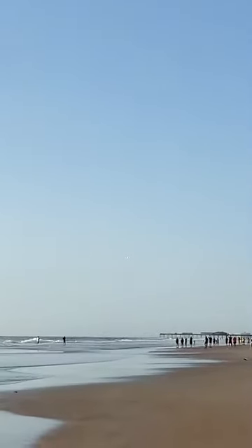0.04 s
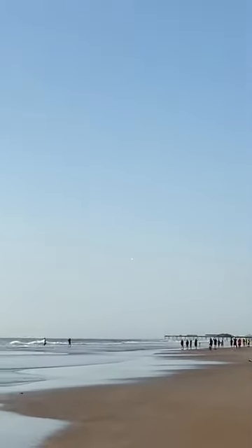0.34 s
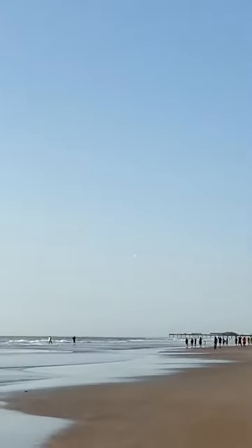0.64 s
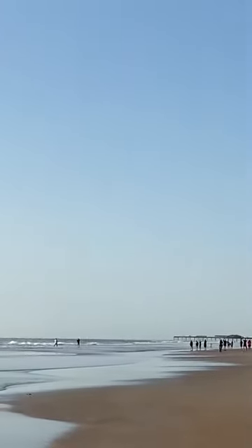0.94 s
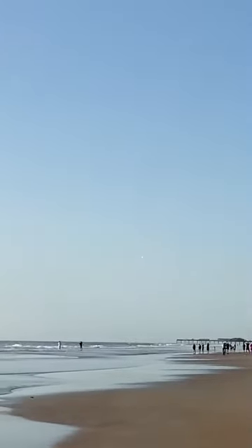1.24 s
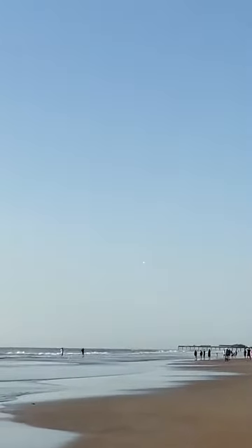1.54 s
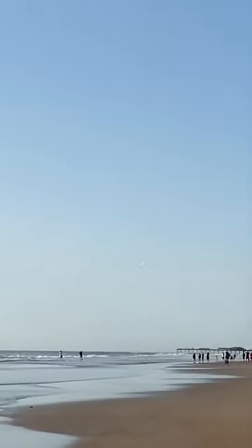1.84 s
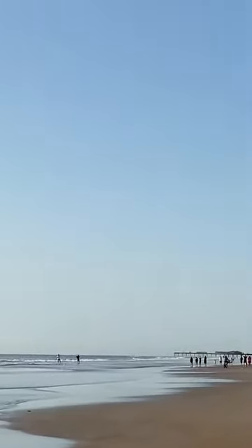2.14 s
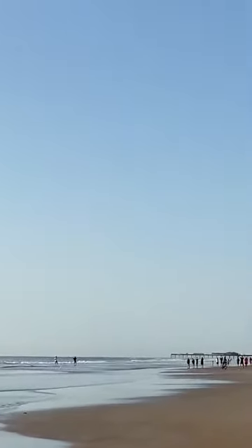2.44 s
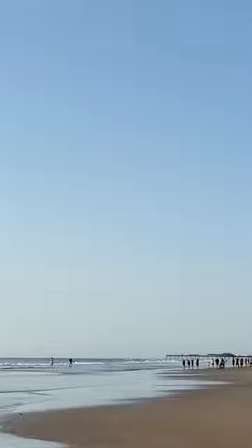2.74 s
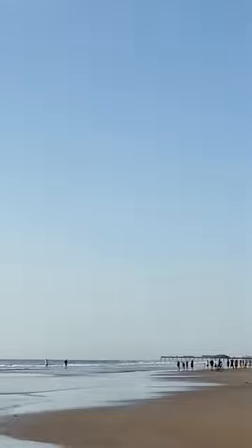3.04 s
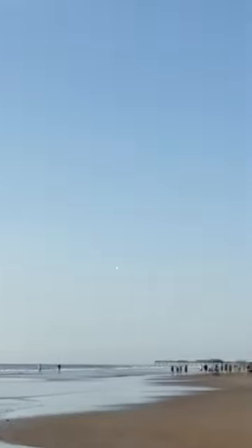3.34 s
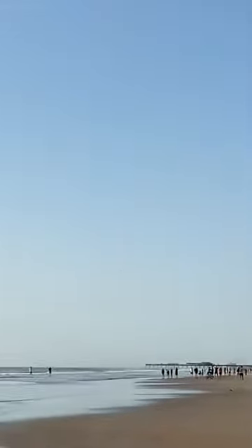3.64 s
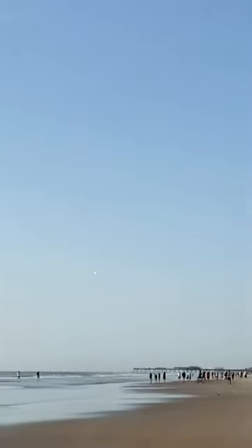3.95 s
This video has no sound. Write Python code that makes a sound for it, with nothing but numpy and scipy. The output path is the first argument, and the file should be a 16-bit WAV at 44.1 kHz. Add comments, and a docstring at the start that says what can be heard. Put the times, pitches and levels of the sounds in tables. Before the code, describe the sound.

Gentle surf runs throughout on an open beach, a foamy wash of shallows over the deeper roll of a far breaker. A light breeze rumbles and softly thumps at the microphone, with occasional faint handling clicks.

```python
"""Low surf in a light wind

A distant breaker swells and rolls out over the steady wash of the shallows on a wide sandy beach.
Both are broadband noise, and bursting foam adds a fine grain to the wash. Wind rumbles, hisses and
thumps at a hand-held two-port microphone, while fingers brush its case and make it tick."""
import sys
import numpy as np
from scipy import signal
from scipy.fft import rfft, irfft
from scipy.io import wavfile
from scipy.ndimage import uniform_filter1d

SR = 44100
rng = np.random.default_rng(int(sys.argv[2]) if len(sys.argv) > 2 else 0)


def store_pcm(level_fs):
    """Save levels as 16-bit WAV."""
    pcm = np.round(np.clip(level_fs, -1, 1) * 32767).astype(np.int16)
    wavfile.write(sys.argv[1], SR, np.atleast_2d(pcm).T)


N = 176400
TIME = np.arange(N) / SR
FREQUENCIES = np.fft.rfftfreq(N, 1 / SR)

# strength of the wind (time [s], level [dB])
WIND_LEVEL = [(0, -1), (.2, -1), (.33, -2), (.48, 0.5), (.74, -1), (.9, 1.5), (1.2, 0.5), (1.35, -2),
              (1.55, -2.5), (1.82, 1.5), (1.95, 0), (2.4, -2), (2.65, -5.5), (2.88, -0.5), (3.3, -2),
              (3.7, -0.5), (3.8, -6), (3.92, 0.5), (4, -2)]
# spectra of the wind's rumble and hiss (frequency [Hz], density [dB/Hz])
RUMBLE_SPECTRUM = [(10, -104), (20, -99), (30, -77), (45, -62.3), (62, -58), (79, -54), (100, -58),
                   (130, -58.5), (200, -75), (500, -100), (1500, -150)]
HISS_SPECTRUM = [(2000, -135), (5000, -108), (9000, -118), (11500, -120), (13500, -126), (15500, -128)]
# eddies at the microphone (centre time [s], half length [s], level [dB], frequency [Hz])
EDDIES = [(.775, .012, -27, 180), (.98, 0.0083, -25, 52), (1.024, .012, -24.5, 85.7),
          (1.078, .013, -26.5, 72.1), (1.192, .011, -30, 74.9), (1.54, 0.0068, -30, 90),
          (1.615, 0.009, -32, 80), (1.647, .011, -23.5, 66.3), (1.812, .012, -31, 83.4),
          (2.53, 0.013, -33, 65.2)]
# finger strokes on the case (start [s], length [s], level [dB])
STROKES = [(.16, 0.13, -7), (0.498, .09, -3.5), (.65, .3, -11), (1.015, 0.14, 1.5), (1.19, 0.45, -5),
           (1.665, 0.066, -3.5), (2.185, .04, 1), (2.362, 0.059, -6), (2.749, .05, -5), (2.845, .03, -1),
           (3.79, 0.11, -9)]
# spectrum of sliding skin (frequency [Hz], density [dB/Hz])
FRICTION_SPECTRUM = [(1500, -130), (5000, -99), (7300, -100.5), (10500, -105), (13000, -110), (16000, -115)]
# presses that tick the case (time [s], level [dB], firmness as a tilt toward low modes [dB/octave])
PRESSES = [(0.2618, -9, 2), (.5135, -9, -6), (.9145, -8, -11), (1.1367, -10, -3), (1.608, -13, 7),
           (1.8276, -1, 6.5), (2.3775, -15, -6), (2.5972, -22, 0), (2.6028, -7.5, -1), (2.7467, -3.5, 4)]
# modes of the case (frequency [Hz], level [dB], time to decay by 60 dB [s])
CASE_MODES = [(378, -51, 0.023), (1150, -47, 0.0082), (1960, -44.5, 0.0047), (3070, -41, 0.003),
              (5160, -37.5, 0.0028), (7340, -33, .003), (8940, -35.5, 0.0025), (10240, -39, 0.002),
              (15000, -42, .0012)]
# surge of the shallow water (time [s], level [dB])
SURGE_LEVEL = [(0, -0.5), (.2, -1.2), (.55, -1.1), (.95, -1), (1.25, -0.3), (1.65, -1.7), (1.95, -1.5),
               (2.6, -0.5), (2.87, -2), (3.18, 0), (3.4, -2), (3.62, -1.5), (3.88, 0), (4, -1.7)]
# spectra of the shallows and of the breaker's roll and crash (frequency [Hz], density [dB/Hz])
WASH_SPECTRUM = [(200, -100), (600, -80), (950, -76.5), (1300, -78), (1700, -80.5), (2200, -84.5),
                 (3000, -88), (4100, -94.5), (5000, -94.5), (6300, -101.5), (7600, -104.5), (10000, -113),
                 (12300, -119.5), (14000, -133), (16000, -140)]
ROLL_SPECTRUM = [(40, -99), (100, -65), (180, -60), (300, -62), (420, -66), (600, -76), (1000, -83),
                 (4000, -150)]
CRASH_SPECTRUM = [(150, -96), (380, -67.5), (600, -70.5), (820, -68.5), (1200, -78), (1700, -87),
                  (3000, -101), (9000, -150)]
# course of the breaker (time [s], roll level [dB], crash level [dB])
BREAKER_LEVELS = [(0, 1.5, -1), (.17, -1, -1.9), (.4, 1.7, .5), (.62, 2.5, 1.5), (.78, 2, 2),
                  (.93, 1.2, -0.5), (1.15, 2, -1.5), (1.35, 1.5, 0.8), (1.65, -0.5, -1.5), (1.86, 0, -2.2),
                  (2.1, 0, -1.5), (2.45, -3.4, -2.5), (2.7, -1.5, -2.5), (2.92, -4.5, -3),
                  (3.15, -3.2, -2.8), (3.55, -3, -1.5), (3.83, -1.5, -4.5), (4, -3, -2)]
# likeness of the noise in the left and right channels (frequency [Hz], correlation [0 to 1])
STEREO_CORRELATION = [(120, .9994), (280, .99), (400, .96), (600, .82), (900, .9), (1150, .8), (1420, .73),
                      (1670, .38), (2000, .93), (2450, .93), (2900, .997), (3900, .997), (4400, .87),
                      (5000, .95), (6100, .8), (7000, .995), (7700, .995), (8300, .85), (9400, .8),
                      (10300, .98), (12200, .65), (13400, .98), (15000, .6)]
# level difference of the microphone's ports (frequency [Hz], left minus right [dB])
PORT_BALANCE = [(150, 0), (440, -.5), (590, -2.4), (830, .5), (1200, .7), (1680, 3.2), (2000, 1.5),
                (2450, 1.5), (2900, 0)]
# phase difference of the ports (frequency [Hz], lead of the left [rad])
PORT_PHASE = [(600, 0), (700, .2), (950, .03), (1450, .35), (1720, -.2), (2350, .3), (3000, .03),
              (4050, .1), (4400, .55), (5100, .15), (6000, 1.4), (7000, 2.95), (7700, 3.3), (9800, 6.1),
              (11500, 6.55), (12700, 9), (13800, 9.5), (15000, 11.4)]


def amp(db):
    """Amplitude grows tenfold for every 20 dB."""
    return 10 ** (np.asarray(db) / 20)


def over_frequency(table):
    """Interpolation of a table on a logarithmic frequency axis."""
    hz, value = np.transpose(table)
    return np.interp(np.log(FREQUENCIES + 1), np.log(hz + 1), value)


def over_time(table):
    """Linear interpolation of each level column at every sample."""
    times, *columns = np.transpose(table)
    return [np.interp(TIME, times, column) for column in columns]


def smooth_field(shape, frames, bins):
    """Moving averages correlate neighbouring values of a random field of unit spread."""
    field = uniform_filter1d(rng.standard_normal(shape), frames, 0)
    field = uniform_filter1d(field, bins, 1)
    return field / field.std()


def noise(spectrum, patchy_db, flicker_db):
    """Partly coherent stereo noise, modulated in drifting patches and by a broadband flicker."""
    spectra = signal.stft(rng.standard_normal((2, N)), nperseg=512, noverlap=384)[2]
    _, bins, frames = spectra.shape
    patches = smooth_field((frames, bins), frames=22, bins=7)
    flicker = smooth_field((frames, 1), frames=7, bins=1)
    modulation = amp(patchy_db * patches + flicker_db * flicker).T
    white = signal.istft(spectra * modulation, nperseg=512, noverlap=384)[1][:, :N]
    shared, apart = rfft(white / white.std())
    correlation = over_frequency(STEREO_CORRELATION)
    mid = shared * np.sqrt((1 + correlation) / 2)
    side = apart * np.sqrt((1 - correlation) / 2)
    channels = np.array([mid + side, mid - side])
    return irfft(channels * amp(over_frequency(spectrum)), N) * np.sqrt(SR / 2)


def wind():
    """Turbulent flow makes a rumble and a thin hiss; the hiss grows more steeply with wind strength."""
    wind_db = over_time(WIND_LEVEL)[0]
    rumble = amp(wind_db) * noise(RUMBLE_SPECTRUM, patchy_db=-0.16, flicker_db=0.2)
    hiss = amp(4.3 * wind_db) * noise(HISS_SPECTRUM, patchy_db=2, flicker_db=1.5)
    return rumble + hiss


def eddies(pitch_sag=0.12):
    """Each eddy is a brief pressure oscillation on the microphone that slows as it passes."""
    out = np.zeros(N)
    for (centre, half_length, db, hz), start_phase in zip(EDDIES, rng.random(len(EDDIES))):
        age = np.clip((TIME - centre) / half_length, -10, 10)
        cycles = start_phase + np.cumsum(hz * np.exp(-pitch_sag * age)) / SR
        out += amp(db) * np.exp(-0.5 * age ** 2) * np.sin(2 * np.pi * cycles)
    return out


def brushes(peak_share=0.11):
    """Friction of skin on the case makes noise whose power rises fast and falls slowly in each stroke."""
    power = np.zeros(N)
    for start, length, db in STROKES:
        corners = [start, start + peak_share * length, start + length]
        power += amp(db) ** 2 * np.interp(TIME, corners, [0, 1, 0])
    return np.sqrt(power) * noise(FRICTION_SPECTRUM, patchy_db=-1.0, flicker_db=2.5)


def ticks(rise_s=0.00005, pivot_hz=8900):
    """The case gives under the grip and rings in damped modes; a firm press favours the low ones."""
    out = np.zeros(N)
    t = np.arange(SR // 50) / SR
    attack = np.minimum(t / rise_s, 1)
    hz, mode_db, t60 = np.transpose(CASE_MODES)[:, :, None]
    for start, db, firmness in PRESSES:
        detuned_hz = hz * (1 + 0.048 * rng.standard_normal(hz.shape))
        tilt_db = -firmness * np.log2(hz / pivot_hz)
        modes = amp(db + mode_db + tilt_db - 60 * t / t60) * np.sin(2 * np.pi * detuned_hz * t)
        span = out[round(start * SR):][:len(t)]
        span += (attack * modes.sum(0))[:len(span)]
    return out


def foam_power(bursts_per_s):
    """Independent bursts of foam, uneven in size, add in power; the mean is scaled to 1."""
    sizes = amp(-np.minimum(rng.exponential(1, N), 5))
    bursts = sizes * (rng.random(N) < bursts_per_s / SR)
    power = np.convolve(bursts ** 2, np.hanning(16), "same")
    return power / power.mean()


def wash(foam_share=0.06):
    """Water spreading over sand makes broadband noise; bursting foam carries a share of its power."""
    fizz = np.sqrt(1 - foam_share + foam_share * foam_power(bursts_per_s=2300))
    surge = amp(over_time(SURGE_LEVEL)[0])
    return surge * fizz * noise(WASH_SPECTRUM, patchy_db=0.7, flicker_db=0.55)


def breaker():
    """A wave breaking far off radiates two incoherent noise bands: a deep roll and a brighter crash."""
    roll_db, crash_db = over_time(BREAKER_LEVELS)
    roll = amp(roll_db) * noise(ROLL_SPECTRUM, patchy_db=-0.04, flicker_db=0.92)
    crash = amp(crash_db) * noise(CRASH_SPECTRUM, patchy_db=0.63, flicker_db=-0.5)
    return roll + crash


def scene():
    """Superposition: the pressures from sea, wind and hand add."""
    return breaker() + wash() + wind() + eddies() + ticks() + brushes()


def record(dry):
    """The ports' transfer functions differ in level and phase; a low-pass filter limits the band."""
    balance = amp(over_frequency(PORT_BALANCE) / 2)
    right_lag = np.exp(-1j * over_frequency(PORT_PHASE))
    ports = irfft(rfft(dry) * np.array([balance, right_lag / balance]), N)
    low_pass = signal.firwin(511, cutoff=15800, window=("kaiser", 9), fs=SR)
    return signal.oaconvolve(ports, low_pass[None], "same")


dry = scene()
out = record(dry)
store_pcm(out)
```